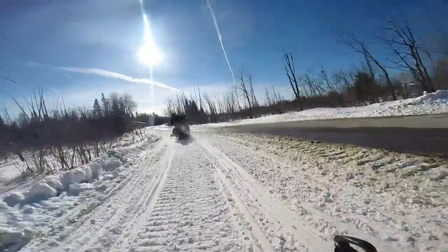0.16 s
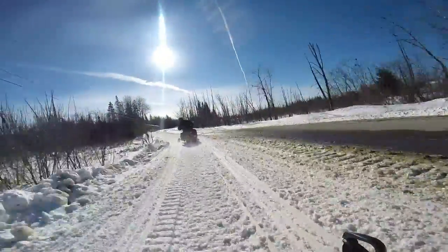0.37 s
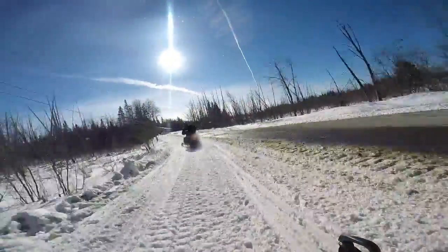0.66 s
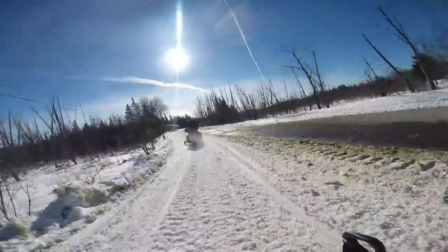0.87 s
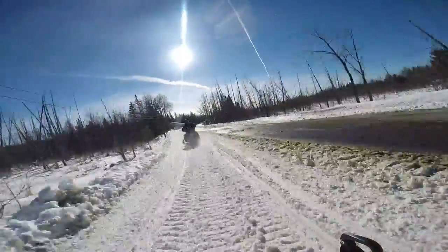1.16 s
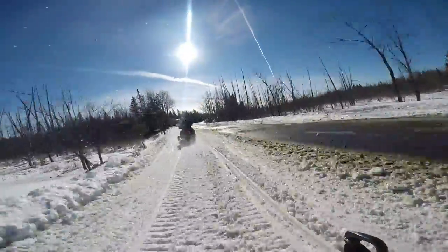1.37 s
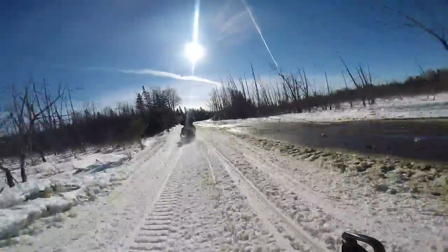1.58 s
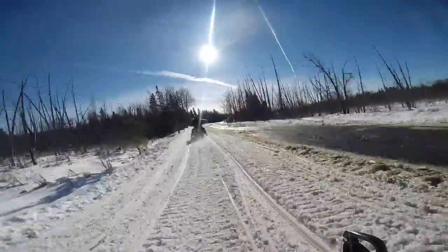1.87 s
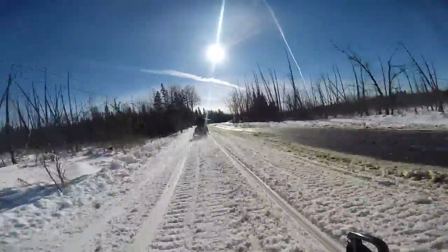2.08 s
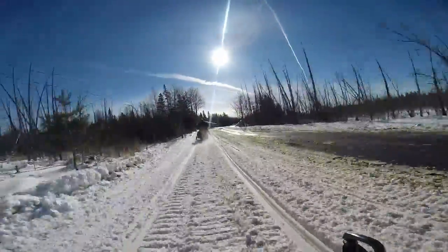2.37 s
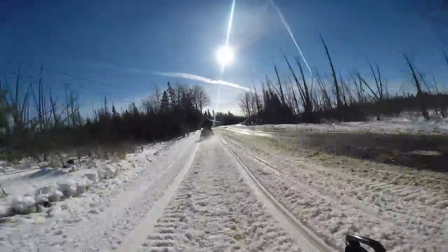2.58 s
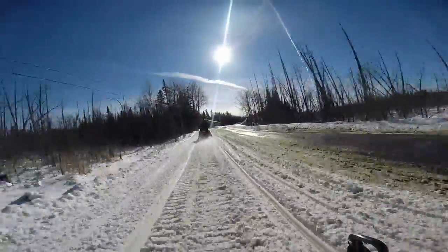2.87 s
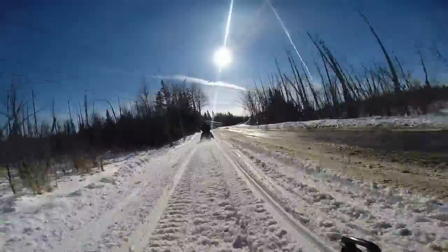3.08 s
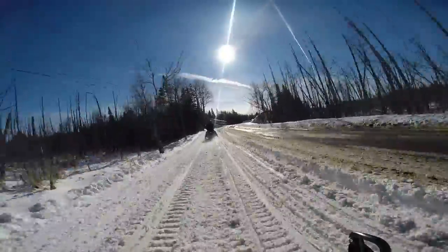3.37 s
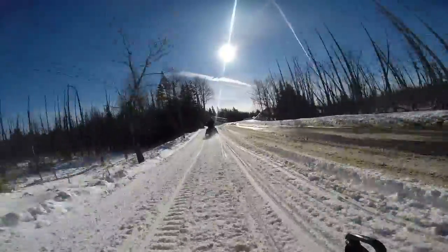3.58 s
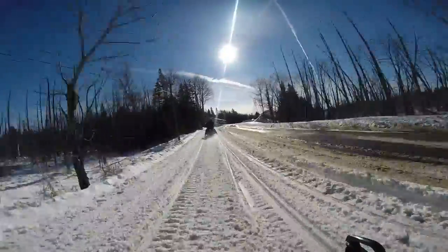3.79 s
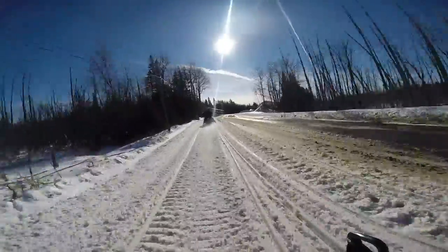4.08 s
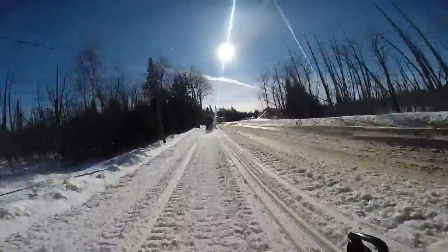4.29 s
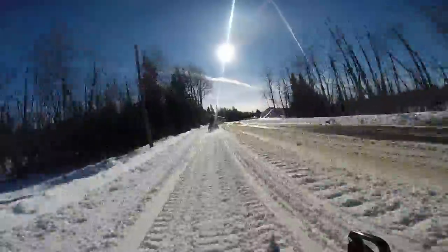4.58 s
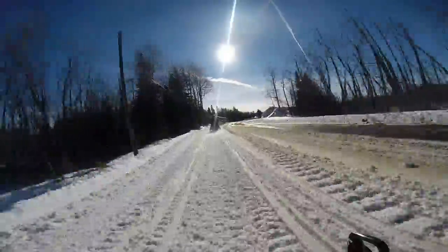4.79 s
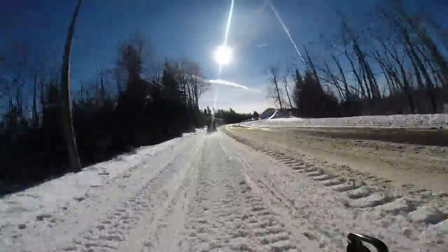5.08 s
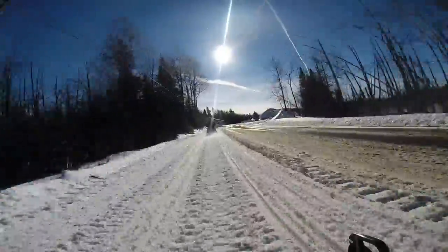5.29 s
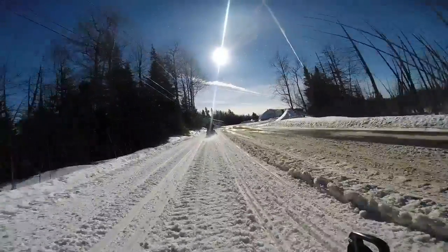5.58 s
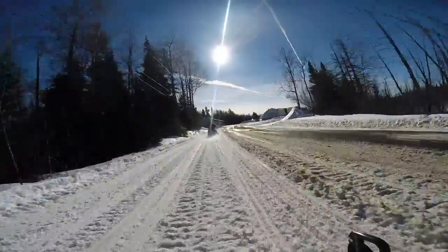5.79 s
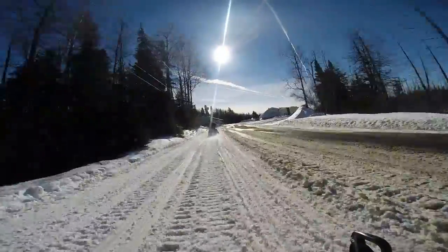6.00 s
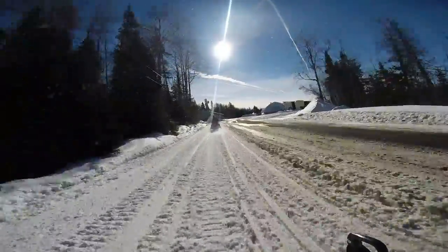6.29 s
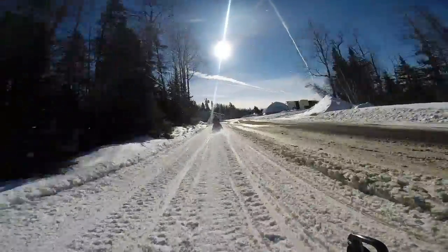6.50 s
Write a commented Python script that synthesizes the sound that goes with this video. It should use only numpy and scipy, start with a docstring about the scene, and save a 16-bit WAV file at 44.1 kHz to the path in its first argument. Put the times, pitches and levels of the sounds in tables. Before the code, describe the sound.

A snowmobile runs along a packed snow trail, its engine holding a nearly steady, buzzing drone with dense metallic clatter and a bright hiss of snow spray. Underneath, wind rumbles in gusts and the hum of the track climbs slowly in pitch as the machine gathers speed. A few faint ice ticks come and go. The microphone rides on the machine inside a closed housing, so everything sounds close and boxy.

```python
"""On a packed trail a snowmobile gathers speed, heard from inside a closed housing on the machine.
Wind and snow rumble below; ice chips tick on the housing. Block drone, valve clatter, snow spray
and intake hiss pulse with the engine and ring in the housing. The three-cylinder engine holds a
nearly steady speed while the rubber track winds up; both shake the frame with low tones."""
import sys
import numpy as np
from scipy import signal
from scipy.fft import rfft, irfft, next_fast_len
from scipy.io import wavfile
from scipy.ndimage import uniform_filter1d, map_coordinates

SR = 44100
rng = np.random.default_rng(int(sys.argv[2]) if len(sys.argv) > 2 else 0)


def dump_mix(stems):
    """Bounce the given channels to the path in sys.argv[1] as a 16-bit WAV at rate SR."""
    frames = np.atleast_2d(stems).T  # one column per channel
    limited = np.clip(frames, -1, 1)  # hard clip at full scale
    pcm = np.round(limited * 32767).astype(np.int16)
    wavfile.write(sys.argv[1], SR, pcm)


N = 292824
TIME_S = np.arange(N) / SR


def amp(db):
    """Decibels to gain."""
    return 10 ** (np.asarray(db) / 20)


def unit_rms(x):
    """Scale to rms 1."""
    return x / np.sqrt(np.mean(x ** 2) + 1e-20)


def curves(rows):
    """One per-sample curve for each column after time_s."""
    time_s, *columns = np.transpose(rows)
    return [np.interp(TIME_S, time_s, column) for column in columns]


def wobble(rate_hz):
    """Smooth random curve, rate_hz knots a second."""
    knots = rng.standard_normal(int(N * rate_hz / SR) + 4)
    return map_coordinates(knots, [TIME_S * rate_hz])


def filtered(x, response):
    """Zero-phase filter with gain response(hz)."""
    size = next_fast_len(N + 8192)
    return irfft(rfft(x, size) * response(np.fft.rfftfreq(size, 1 / SR)), size)[..., :N]


# Rings and dips of mount and housing: centre_hz, width_hz, lift_db
HOUSING_RINGS = [(55, 14, 4), (775, 55, 9), (1640, 60, 2), (1720, 50, -3), (1810, 45, 6), (1890, 80, 3),
                 (2140, 50, 3), (2315, 30, 5), (2365, 30, -3), (2420, 32, 10.5), (2725, 60, 5),
                 (2860, 60, -3), (2930, 40, 3), (3030, 90, 4), (3240, 80, -5), (3340, 60, 3),
                 (3463, 55, 10), (3640, 60, 5), (4150, 190, 5), (4370, 150, -3), (4900, 120, -4),
                 (5220, 200, 4), (5635, 60, 5), (5870, 120, 2), (6370, 90, 5), (7350, 200, 4),
                 (10200, 300, 5), (11900, 700, 3)]
def through_housing(x, spectrum):
    """Shape x by a source spectrum and the housing's narrow resonances; rms 1."""
    freq_hz, level_db = np.transpose(spectrum)
    def response(hz):
        source_db = np.interp(np.log(hz + 1), np.log(freq_hz + 1), level_db)
        rings_db = sum(db / (1 + (2 * (hz - centre) / width) ** 2) for centre, width, db in HOUSING_RINGS)
        return amp(source_db + rings_db)
    return unit_rms(filtered(x, response))


# Wind strength: time_s, level_db
WIND_LEVEL = [(0.0, -19), (0.4, -17.5), (0.9, -21), (1.45, -18.5), (1.6, -20), (2.5, -16.5), (3.1, -16),
              (3.6, -15), (3.95, -15.5), (4.15, -14.5), (4.6, -16), (5.2, -14), (5.6, -15.5), (6.1, -17),
              (6.55, -15)]
# Rumble spectrum: freq_hz, relative_db
RUMBLE_SPECTRUM = [(9, -44), (18, -20), (27, 3.5), (36, -10.5), (50, 2), (80, -2), (100, -1), (150, -3.5),
                   (190, -8.5), (230, -14.5), (290, -17), (340, -22.5), (420, -23.5), (600, -44),
                   (800, -68), (1320, -120)]
def rumble():
    """Wind and skis rumble in gusts."""
    gusts = amp(curves(WIND_LEVEL)[0] + 1.04 * wobble(9))
    return gusts * through_housing(rng.standard_normal(N), RUMBLE_SPECTRUM)


# Single chips: start_s, level_db, pitch_hz
ICE_CHIPS = [(0.8245, -25, 10300), (0.8565, -29, 10100), (1.4551, -22, 14000), (1.476, -21, 9900),
             (4.3216, -30, 10500), (4.7287, -38, 12100), (4.7624, -29, 10500), (4.7834, -37, 8790),
             (5.1422, -28, 13000), (5.1966, -27, 9890), (5.4534, -32, 9320), (5.4694, -33, 9370),
             (5.5553, -30, 9950), (5.5684, -33, 8560), (5.5814, -29, 10300), (6.0077, -42, 9780),
             (6.3096, -35, 9800), (6.331, -28, 10100), (6.6089, -31, 9100)]
# Showers of fine ice: centre_s, half_width_s, level_db
ICE_SHOWERS = [(.85, .03, -51), (1.48, .04, -46), (4.33, .02, -53), (4.76, .04, -49), (5.14, .055, -47),
               (5.46, .03, -45), (5.59, .045, -43), (5.99, .02, -53), (6.33, .03, -46)]
def ice():
    """Single chips click on the housing; showers are dense, spiky grains."""
    clicks, t = np.zeros(N + 512), np.arange(256) / SR
    attack_s, t60_s = 0.001, 0.005
    envelope = np.minimum(t / attack_s, 1) ** 2 * amp(-60 * np.maximum(t - attack_s, 0) / t60_s)
    for start_s, level_db, pitch_hz in ICE_CHIPS:
        click = 0.67 * np.sin(2 * np.pi * pitch_hz * t) + rng.standard_normal(len(t))
        clicks[round(start_s * SR):][:len(t)] += amp(level_db) * envelope * click
    showers = sum(amp(db) * np.exp(-((TIME_S - centre) / width) ** 2) for centre, width, db in ICE_SHOWERS)
    grains = unit_rms(rng.standard_normal(N) * amp(5 * wobble(700)))
    treble_band = lambda hz: 1 / (1 + (7000 / (hz + 1)) ** 6) / (1 + (hz / 14000) ** 3)
    return filtered(clicks[:N] + showers * grains, treble_band)


def impacts(cycles, jitter_s=12e-6, per_cycle=120):
    """Valves, gears and chain strike at the same crank angles each cycle; strengths change slowly."""
    whole_cycles = np.arange(int(cycles[-1]))[:, None]
    at_sample = np.interp(whole_cycles + rng.random(per_cycle), cycles, np.arange(N))
    at_sample += jitter_s * SR * rng.standard_normal(at_sample.shape)
    at_sample = np.clip(np.round(at_sample), 0, N - 1).astype(int)
    strengths = uniform_filter1d(rng.standard_normal(at_sample.shape), size=5, axis=0)
    return unit_rms(np.bincount(at_sample.ravel(), strengths.ravel(), N))


def patchy_noise(patch_db):
    """White noise with patches of random gain in time and frequency."""
    bins = signal.stft(rng.standard_normal(N + 512), nperseg=512)[2]
    patches = uniform_filter1d(rng.standard_normal(bins.shape), size=5, axis=0)
    patches = uniform_filter1d(patches, size=10, axis=1)
    return signal.istft(bins * amp(patch_db * unit_rms(patches)), nperseg=512)[1][:N]


def machinery(blows, cycles, blow_share, swell_depth, patch_db):
    """Repeating impacts mixed by power with noise that swells once a cycle."""
    noise = patchy_noise(patch_db) * (1 + swell_depth * np.cos(2 * np.pi * cycles))
    return np.sqrt(blow_share) * blows + np.sqrt(1 - blow_share) * noise


# Machine noise under load: time_s, level_db
LOAD_LEVEL = [(0.03, -27), (0.35, -29), (0.75, -30.5), (1.3, -29), (1.6, -28), (2.1, -27), (3.08, -24.5),
              (3.9, -26), (4.1, -25), (4.6, -26.5), (4.95, -25), (5.43, -25), (5.94, -28.5), (6.3, -26.5),
              (6.6, -29)]
def load_gain(offset_db, db_per_db, waver_db):
    """Gain that makes the machine noises rise and fall together."""
    load_db, = curves(LOAD_LEVEL)
    swing_db = db_per_db * (load_db - load_db.mean())
    return amp(load_db.mean() + offset_db + swing_db + waver_db * wobble(8))


# Intake spectrum: freq_hz, relative_db
HISS_SPECTRUM = [(4120, -37), (7000, -5), (7470, 0.5), (8440, -6.5), (10200, -5.5), (11000, -8),
                 (11900, -9.5), (15300, -19.5)]
def intake_hiss(blows, cycles):
    """The intake hisses in the high treble, pulsing with the engine."""
    gain = load_gain(offset_db=-22.5, db_per_db=0.71, waver_db=0)
    excitation = machinery(blows, cycles, blow_share=0.2, swell_depth=0.18, patch_db=1.5)
    return gain * through_housing(excitation, HISS_SPECTRUM)


# Block spectrum: freq_hz, relative_db
DRONE_SPECTRUM = [(260, -26), (450, -2.5), (645, -8.5), (870, -9.5), (1020, -8.5), (1300, -15.5),
                  (1690, -36), (2860, -120)]
def block_drone(blows, cycles, rise_db_per_s=0.65):
    """The engine block drones, swelling as the machine gathers speed."""
    rise_db = rise_db_per_s * (TIME_S - N / SR / 2)
    gain = load_gain(offset_db=-17.5 + rise_db, db_per_db=0.9, waver_db=1.5)
    excitation = machinery(blows, cycles, blow_share=0.26, swell_depth=0.063, patch_db=0.6)
    return gain * through_housing(excitation, DRONE_SPECTRUM)


# Spray spectrum: freq_hz, relative_db
SPRAY_SPECTRUM = [(2650, -38), (4500, -14), (4820, -16), (5090, -6), (5730, 1), (6500, -6.5), (7000, -16),
                  (9100, -46), (15400, -120)]
def snow_spray(blows, cycles):
    """Snow spray rings brightly in the housing."""
    gain = load_gain(offset_db=-9.5, db_per_db=0.79, waver_db=0.4)
    excitation = machinery(blows, cycles, blow_share=0.19, swell_depth=0.12, patch_db=0.1)
    return gain * through_housing(excitation, SPRAY_SPECTRUM)


# Valve spectrum: freq_hz, relative_db
CLATTER_SPECTRUM = [(710, -54), (1200, -20), (1290, -17.5), (1470, -5.5), (1860, -6.5), (2030, -6),
                    (2400, -1), (3250, -12.5), (3540, -13.5), (3870, -16.5), (5000, -18), (6500, -53),
                    (11000, -120)]
def valve_clatter(blows, cycles):
    """Valve strikes ring the housing in the upper midrange."""
    gain = load_gain(offset_db=0, db_per_db=1, waver_db=0.26)
    excitation = machinery(blows, cycles, blow_share=0.36, swell_depth=0.13, patch_db=0.4)
    return gain * through_housing(excitation, CLATTER_SPECTRUM)


def shake(turns, flutter_db, drift_rad, rate_hz):
    """A sine of rms near 1 whose level and phase waver as the frame bounces."""
    gain = np.sqrt(2) * amp(flutter_db * wobble(rate_hz))
    return gain * np.sin(2 * np.pi * (turns + rng.random()) + drift_rad * wobble(rate_hz))


# Ground speed: time_s, lug_hz
LUG_RATE = [(0.0, 113.5), (0.4, 119.7), (1.8, 137.7), (2.4, 142.7), (3.0, 150.3), (3.4, 151.5),
            (4.2, 158.2), (5.2, 164.2), (5.9, 164.8), (6.64, 170.0)]
# Track tones: time_s, lug_db, drive_db
TRACK_LEVELS = [(0.0, -42, -18), (0.8, -37, -33), (1.4, -16, -29), (2.0, -24.5, -21.5), (2.5, -27, -28),
                (3.35, -18.5, -24), (3.7, -27, -31), (4.2, -19, -26), (5.0, -22, -24), (5.8, -22.5, -22),
                (6.4, -18, -30), (6.64, -20.5, -26)]
# Lug overtones before their fade: lug_multiple, level_db
LUG_HARMONICS = [(2, -38), (3, -46)]
def track(fade_hz=155.6):
    """Lugs slap the wheels in step with ground speed; the drive shakes at a third of their rate."""
    lug_hz, = curves(LUG_RATE)
    lug_db, drive_db = curves(TRACK_LEVELS)
    lugs = np.cumsum(lug_hz) / SR
    slap = amp(lug_db) * shake(lugs, flutter_db=2.1, drift_rad=0.25, rate_hz=14)
    drive = amp(drive_db) * shake(lugs / 3, flutter_db=3.5, drift_rad=0.29, rate_hz=8)
    overtones = sum(amp(db) * shake(multiple * lugs, flutter_db=4, drift_rad=0.75, rate_hz=11)
                    for multiple, db in LUG_HARMONICS)
    fade = 1 / (1 + (lug_hz / fade_hz) ** 16)
    return slap + drive + fade * overtones


# Engine tones: time_s, firing_db, crank_db
ENGINE_LEVELS = [(0.0, -14, -33), (0.5, -13.5, -33), (1.05, -9.5, -28), (1.35, -23, -24.5), (1.8, -16, -26),
                 (2.6, -20.5, -23.5), (3.3, -25, -22.5), (3.65, -18, -22.5), (4.4, -23, -22.5),
                 (5.0, -21.5, -24), (5.8, -25.5, -23.5), (6.64, -31, -23)]
# Weak engine orders: cycle_multiple, level_re_crank_db
WEAK_ORDERS = [(4, -9), (5, -12.5), (6, -22.5), (9, -33.5), (12, -27), (24, -33), (27, -32)]
def engine(cycles):
    """Three firings and two crank turns a cycle shake the mount, along with weaker orders."""
    firing_db, crank_db = curves(ENGINE_LEVELS)
    firing = amp(firing_db) * shake(3 * cycles, flutter_db=1.8, drift_rad=0.24, rate_hz=14)
    crank = amp(crank_db) * shake(2 * cycles, flutter_db=1.0, drift_rad=0.23, rate_hz=8)
    slow_load = amp(uniform_filter1d(crank_db, SR // 2))
    orders = sum(amp(db) * shake(multiple * cycles, flutter_db=2.0, drift_rad=0.59, rate_hz=7)
                 for multiple, db in WEAK_ORDERS)
    return firing + crank + slow_load * orders


# Engine speed in four-stroke cycles: time_s, cycle_hz
CYCLE_RATE = [(0.0, 40.8), (0.4, 40.4), (1.0, 42.0), (1.35, 42.55), (2.0, 42.0), (2.4, 43.1), (3.0, 43.85),
              (3.4, 43.6), (3.6, 42.95), (4.4, 42.85), (5.1, 43.65), (5.4, 43.1), (5.8, 42.85),
              (6.64, 42.9)]
def scene():
    """All sources summed to mono; one cycle count times the engine and its noises."""
    cycles = np.cumsum(curves(CYCLE_RATE)[0]) / SR
    lows = engine(cycles) + track() + rumble()
    blows, intake_blows = impacts(cycles), impacts(cycles)
    noises = block_drone(blows, cycles) + valve_clatter(blows, cycles) + snow_spray(blows, cycles)
    return (lows + noises + intake_hiss(intake_blows, cycles) + ice())[None]


def record(dry, ceiling=0.9, top_hz=15725):
    """Peaks are rounded off; the treble fades just under top_hz and stops there."""
    soft = dry / (1 + np.abs(dry / ceiling) ** 4) ** (1 / 4)
    band_limit = lambda hz: (hz < top_hz) * amp(np.interp(hz, [15200, 15330, top_hz], [0, -14, -24]))
    return filtered(soft, band_limit)


dry = scene()
out = record(dry)
dump_mix(out)
```